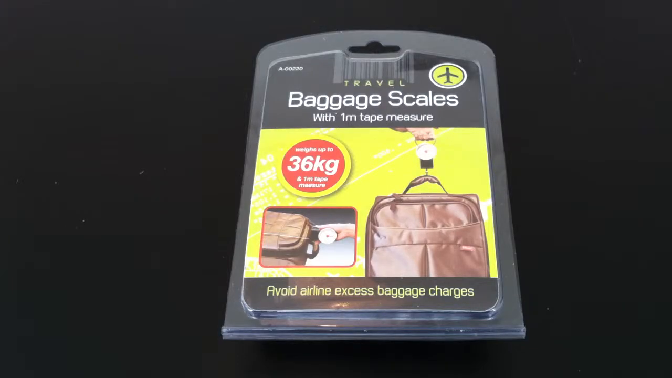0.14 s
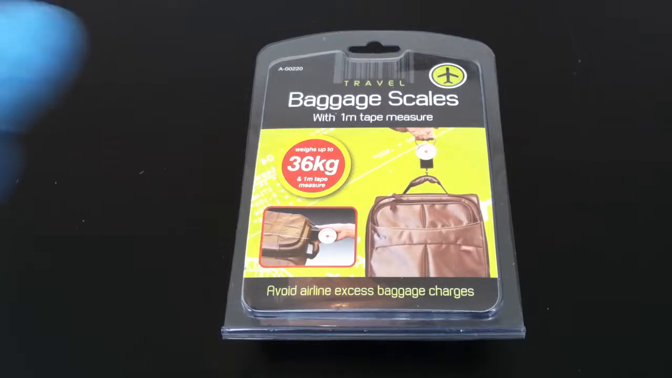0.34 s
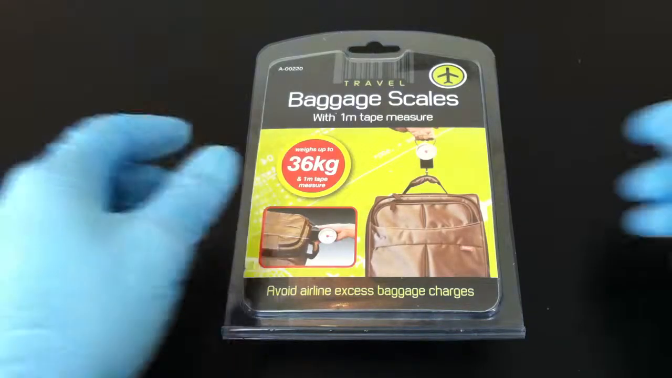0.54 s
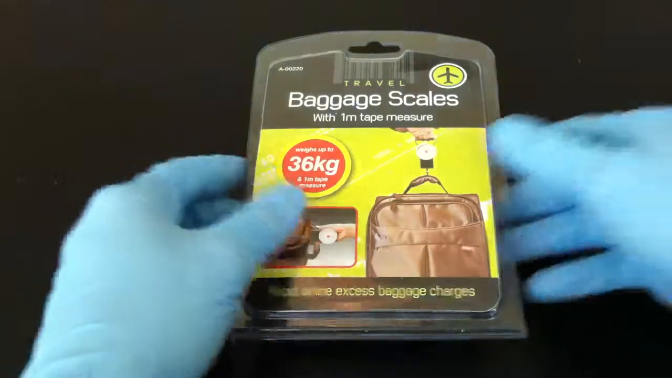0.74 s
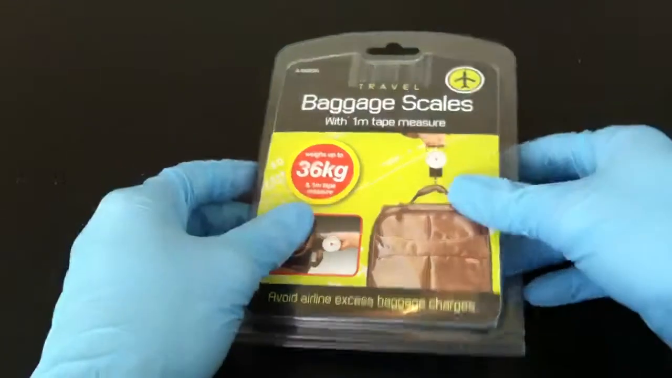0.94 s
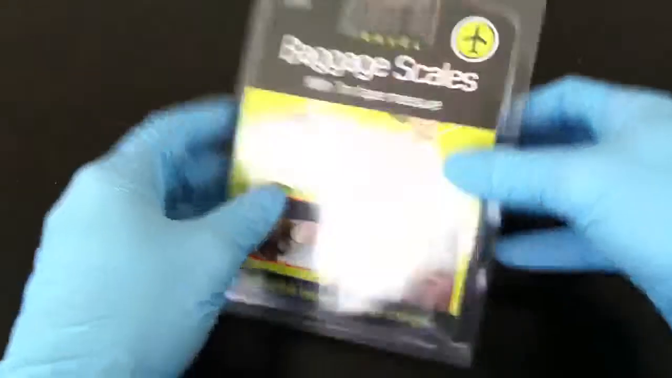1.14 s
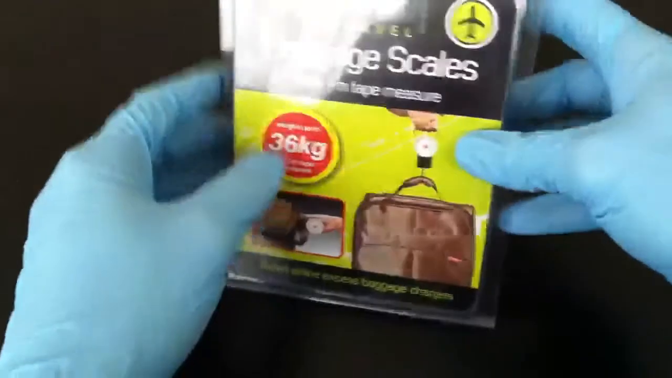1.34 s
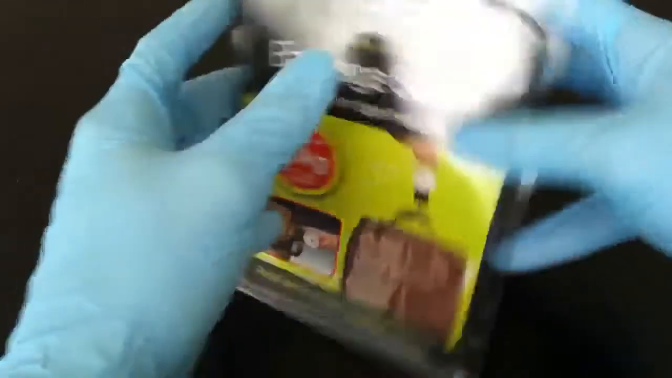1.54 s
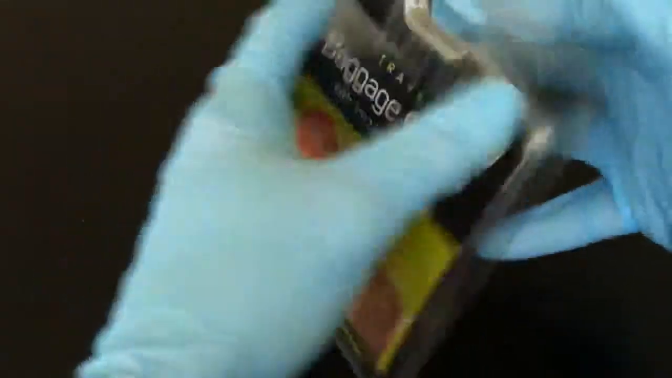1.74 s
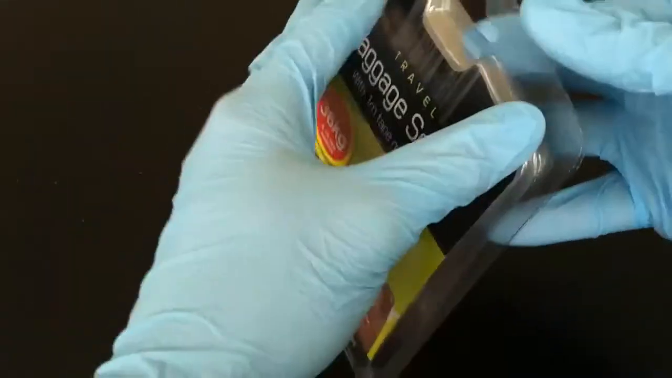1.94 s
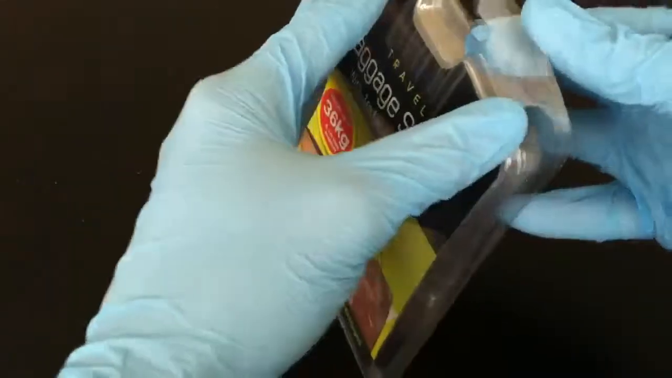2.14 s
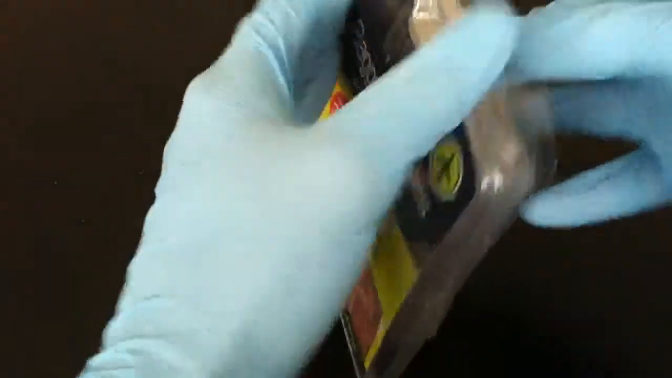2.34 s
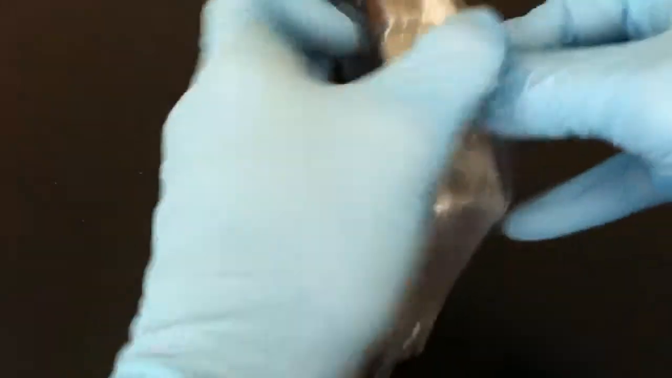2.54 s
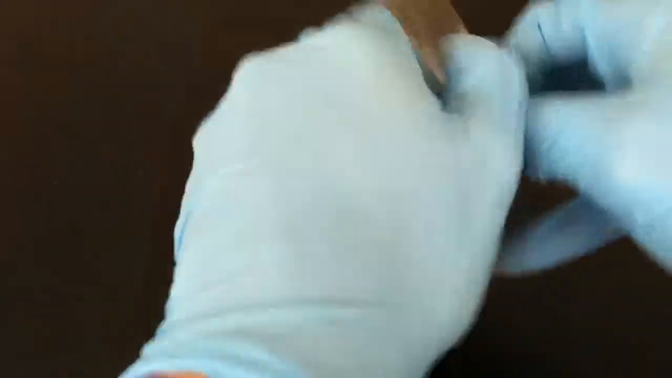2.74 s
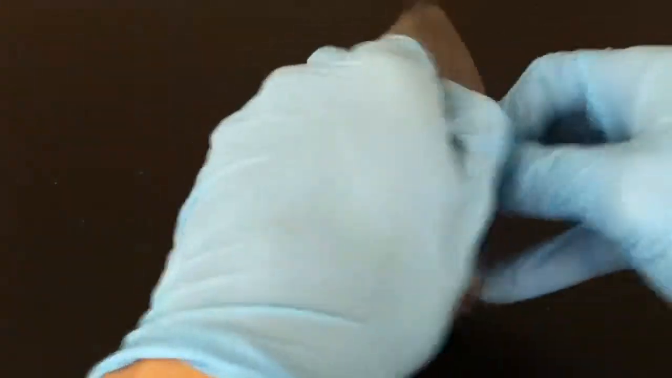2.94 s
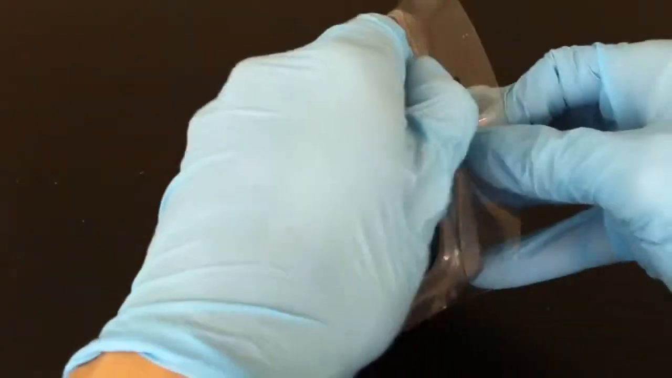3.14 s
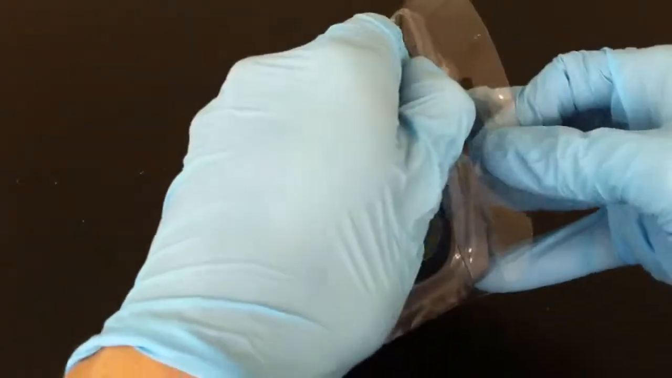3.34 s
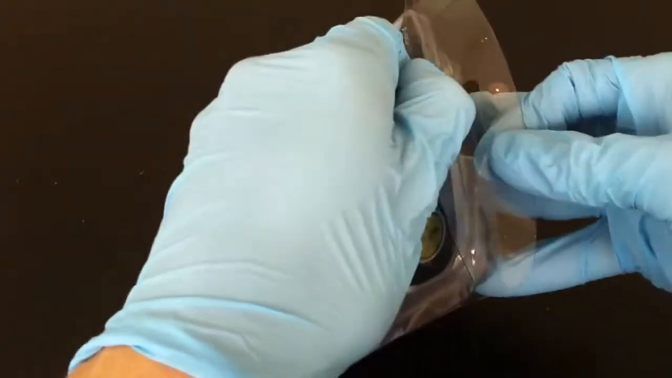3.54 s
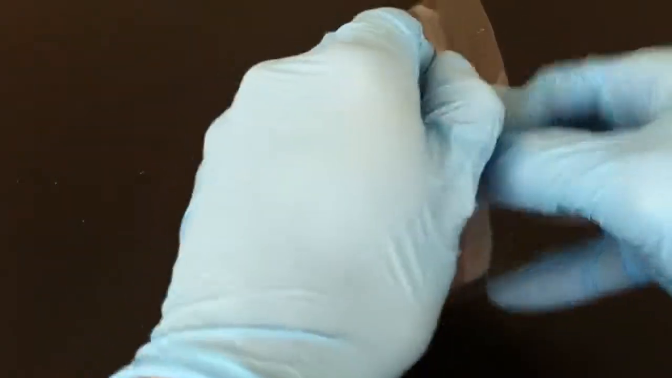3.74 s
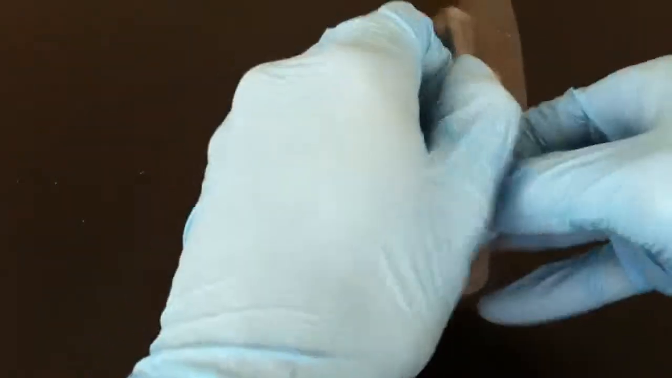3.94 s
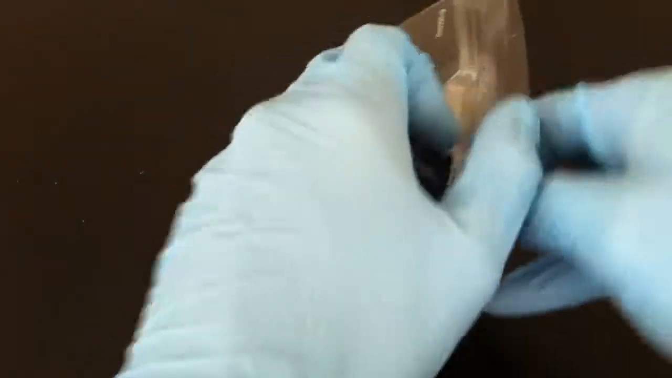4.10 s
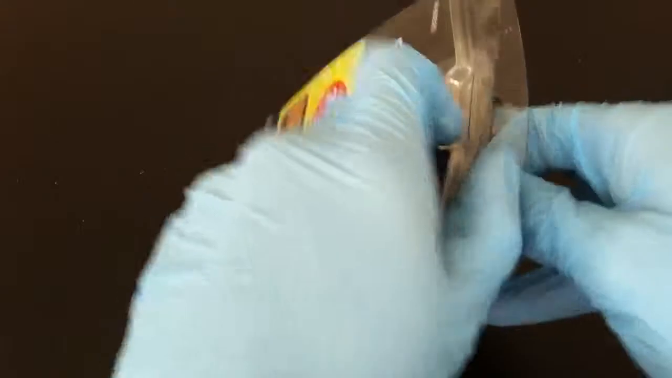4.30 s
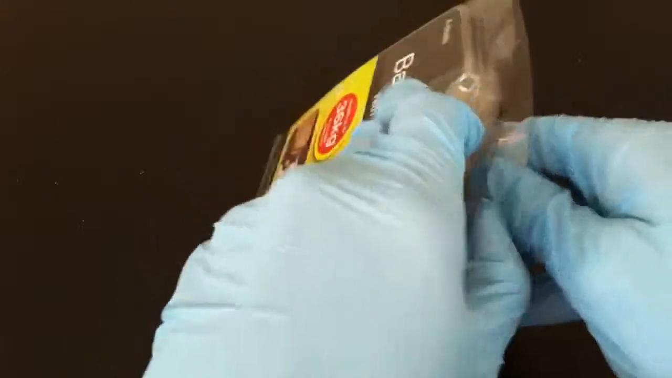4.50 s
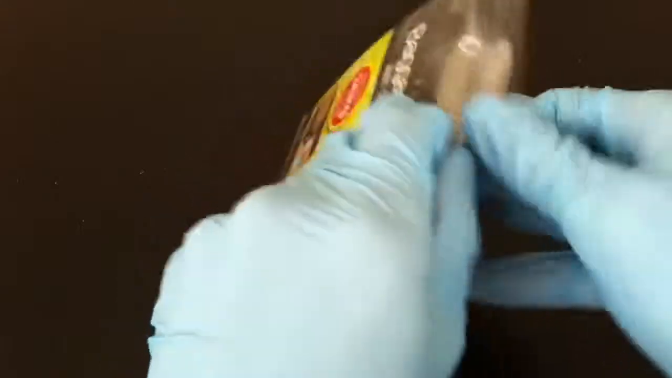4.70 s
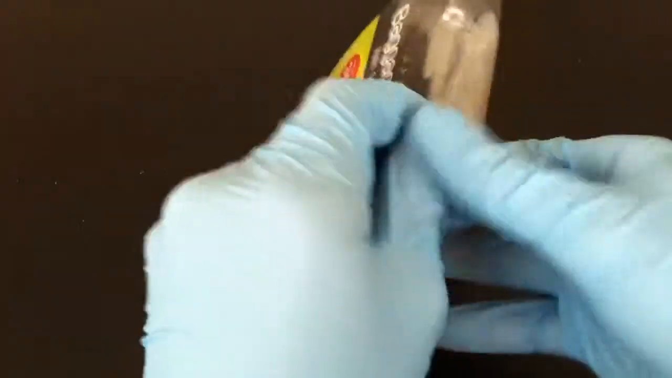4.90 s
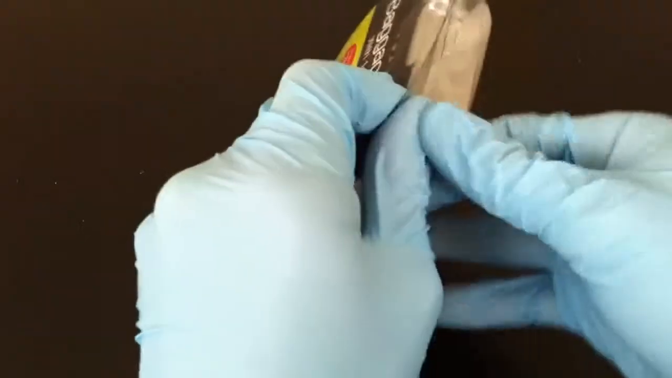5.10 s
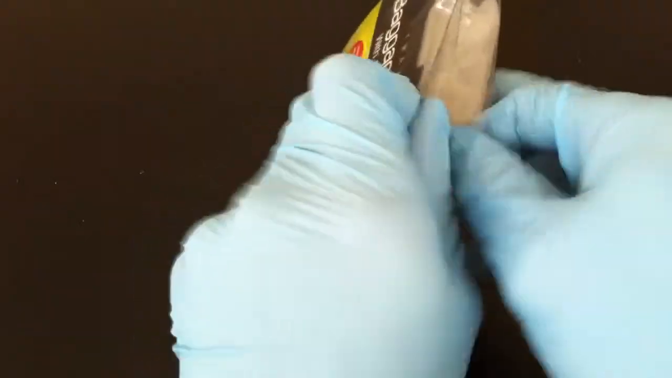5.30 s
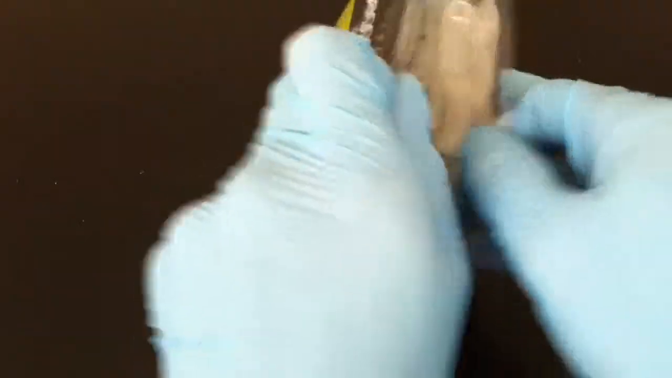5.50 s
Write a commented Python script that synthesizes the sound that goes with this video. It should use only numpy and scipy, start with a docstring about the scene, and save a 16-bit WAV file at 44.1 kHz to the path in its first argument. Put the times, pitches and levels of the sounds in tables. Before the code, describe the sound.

After a nearly silent start with faint room air, fingers bump and scuff a hollow plastic shell. Glove rubbing swells with short creaks and dry clicks, then the seam gives way: a weak pop, two hard cracks, quieter handling, and a final crack after a rapid zip of slips. Close microphone, small bare reverberant room.

```python
"""Gloved hands pick up a stiff plastic blister pack and pry it open, close to the microphone in a quiet, bare room.
Under steady room air (shaped noise), gloves rub the sheet (dense micro-slips) and creases tick (short cracks).
Then fingers bump the hollow shell and scuff (low modes struck by noise), and gloves judder (stick-slip at the rim).
The seam pops four times, softly at first (crack, sheet modes and air puff), the last after a short ratcheting slip.
The room answers the handling and the pops with a diffuse tail."""
import sys
import numpy as np
from scipy import signal
from scipy.fft import rfft, irfft
from scipy.io import wavfile

SR = 44100
rng = np.random.default_rng(int(sys.argv[2]) if len(sys.argv) > 2 else 0)


def output_pcm(signal):
    """Save a mono or channel-first signal as 16-bit PCM at the path in sys.argv[1].

    Samples are clipped to [-1, 1] before scaling.
    """
    pcm = np.clip(np.atleast_2d(signal).T, -1, 1) * 32767
    wavfile.write(sys.argv[1], SR, np.round(pcm).astype(np.int16))


N = 249606
T = np.arange(N) / SR  # time in the scene [s]
BLOW = T[:SR // 4]  # time since one blow [s]


def undb(db):
    """Level law: amplitude gain is ten to the level in decibels over twenty."""
    return 10 ** (np.asarray(db) / 20)


def unit(x):
    """Power normalization: the signal is scaled to rms 1."""
    return x / np.sqrt(np.mean(x ** 2))


def burst(x, db, span=1 / 200):
    """Energy normalization: the level is the rms of all the energy packed into span seconds."""
    return x * undb(db) / np.sqrt(np.sum(x ** 2) / (span * SR))


def add(track, s, x):
    """Superposition: x is mixed into the track from time s."""
    i = int(np.clip(s * SR, 0, N - 1))
    track[i:i + len(x)] += x[:N - i]


def colour(x, points):
    """Spectral shaping: gain in decibels is interpolated over log frequency."""
    hz, db = np.transpose(points)
    f = np.maximum(np.arange(len(x) // 2 + 1) * SR / len(x), 1)
    gain = undb(np.interp(np.log(f), np.log(hz), db))
    return irfft(rfft(x) * gain, len(x))


def filtered(x, order, hz, kind):
    """Butterworth filtering: a flat passband with smooth slopes."""
    return signal.sosfilt(signal.butter(order, hz, kind, fs=SR, output="sos"), x)


def resonate(x, hz, q):
    """Simple resonance: a two-pole band-pass, whose Q is held to at least 1."""
    b, a = signal.iirpeak(min(hz, SR / 3), max(q, 1), fs=SR)
    return signal.lfilter(b, a, x)


def decaying(t, t60):
    """Exponential decay: amplitude falls by 60 dB in t60 seconds."""
    return np.exp(-np.log(1000) * t / t60)


def ring(modes, weights=1):
    """Modal superposition: a blow excites damped sines, neighbours in opposite phase."""
    hz, db, t60 = np.transpose(modes)
    gain = undb(db) * weights * (-1) ** np.arange(len(hz))
    swings = np.sin(2 * np.pi * np.outer(hz, BLOW))
    return gain @ (swings * decaying(BLOW, t60[:, None]))


def convolve(x, response):
    """Linear response: each sample of x launches the response; the length of x is kept."""
    return signal.fftconvolve(x, response)[:len(x)]


# spectrum of the room's steady air: (frequency [Hz], relative level [dB])
AIR_SPECTRUM = [(30, 7.5), (70, -4), (110, -4.5), (160, -0.5), (250, 1.5), (400, -5.5), (630, -9.5),
                (1100, -12), (2200, -16), (5000, -20), (9000, -21), (15500, -24)]


def room_air(level_db=-63.5):
    """Stationary background noise: a random signal with a fixed spectrum."""
    return undb(level_db) * unit(colour(rng.standard_normal(N), AIR_SPECTRUM))


STROKE_CREST = 0.51  # share of a stroke's length at which speed peaks
STROKE_SHARPNESS = 1.2  # a higher exponent narrows the swell


def stroke(start, length):
    """Accelerated sliding: speed, 0-1, swells to a crest and returns to rest."""
    angle = np.interp(T, start + length * np.array([0, STROKE_CREST, 1]), [0, 1, 0])
    return np.sin(np.pi / 2 * angle) ** STROKE_SHARPNESS * (angle > 0)


# gloves creep on the held pack: (start [s], end [s], body level [dB], hiss level [dB])
GRIP_HOLDS = [(0.384, .9, -80, -70), (0.971, 3.0, -68.5, -69.5), (3.678, 4.52, -64.5, -65.5),
              (4.718, 5.42, -69, -64.5)]
GRIP_FADE_S, GRIP_WAVER_DB, GRIP_WAVER_HZ = 0.033, 2.5, 9
# a glove slides over the sheet: (start [s], length [s], body level [dB], hiss level [dB])
GLOVE_STROKES = [(0.833, 0.028, -57.5, -59), (1.226, 0.17, -58, -56.5), (1.297, 0.036, -43.5, -52),
                 (1.612, 0.089, -50.5, -48), (1.668, 0.28, -50, -53.5), (1.79, 0.089, -45.5, -47),
                 (2.472, .17, -58, -61.5), (2.653, 0.13, -46, -51.5), (2.734, .24, -44.5, -46),
                 (4.571, 0.039, -65.5, -54.5), (4.727, 0.069, -57.5, -56), (4.9, 0.061, -57.5, -61),
                 (5.022, 0.033, -69.5, -64.5), (5.249, 0.051, -54, -54.5), (5.617, 0.038, -52, -75)]
# each fingertip scuffs as it lands: levels relative to its bump, lead before it and length
SCUFF_BODY_DB, SCUFF_HISS_DB, SCUFF_LEAD_S, SCUFF_S = -9, -15.5, 0.012, 0.046


def sliding():
    """Incoherent addition: grip, strokes and scuffs sum in power, giving body and hiss gains."""
    knots = np.arange(0, T[-1] + 1, 1 / GRIP_WAVER_HZ)
    waver = undb(GRIP_WAVER_DB * np.interp(T, knots, rng.standard_normal(len(knots))))
    moves = []
    for start, end, body, hiss in GRIP_HOLDS:
        hold = np.clip(np.minimum(T - start, end - T) / GRIP_FADE_S, 0, 1)
        moves.append((waver * hold, body, hiss))
    for s, length, body, hiss in GLOVE_STROKES:
        moves.append((stroke(s, length), body, hiss))
    for s, db, _ in FINGER_BUMPS:
        scuff = stroke(s - SCUFF_LEAD_S, SCUFF_S)
        moves.append((scuff, db + SCUFF_BODY_DB, db + SCUFF_HISS_DB))
    return np.sqrt(sum(np.outer(undb([body, hiss]), speed) ** 2 for speed, body, hiss in moves))


# friction sounding through the sheet: (frequency [Hz], relative level [dB])
BODY_SPECTRUM = [(90, -29.5), (170, -13.5), (300, -1), (480, -1), (650, -5), (850, 0.5), (1100, -3.5),
                 (1600, -5.5), (2300, -7), (3200, -13.5), (5000, -19.5), (16000, -43)]
# friction hissing at the contact: (frequency [Hz], relative level [dB])
HISS_SPECTRUM = [(800, -20.5), (2500, -6), (3800, -2), (4800, -2.5), (6000, -4), (8500, -4.5), (10500, -13),
                 (13000, -15), (16000, -19)]


def rubbing(grain_rate=1800, grain_db=3.0, smooth=1.0, patchy_db=2.0):
    """Dry friction: dense micro-slips (per second) in uneven patches sound the sheet and hiss."""
    slow = colour(rng.standard_normal(N), [(10, 0), (90, 0), (300, -40), (1000, -90)])
    patches = undb(patchy_db * unit(slow))
    out = 0
    for gain, spectrum in zip(sliding(), (BODY_SPECTRUM, HISS_SPECTRUM)):
        sizes = undb(grain_db * np.minimum(rng.exponential(size=N), 5))
        slips = (rng.random(N) < grain_rate / SR) * sizes * rng.choice([-1, 1], N)
        friction = unit(slips) + smooth * rng.standard_normal(N)
        out = out + unit(colour(friction, spectrum) * patches) * gain
    return out


def many_modes(x, share, t60):
    """High modal density: countless weak modes ring on as decaying noise and ripple the spectrum."""
    after = rng.standard_normal(len(BLOW)) * decaying(BLOW, t60)
    after /= np.sqrt(np.sum(after ** 2))
    return (x + share * convolve(x, after)) / np.hypot(1, share)


# reverberation of the bare room: (frequency [Hz], relative level [dB], t60 [s])
ROOM_BANDS = [(100, -12.5, 0.51), (300, -3.5, .7), (584, -3.5, 0.51), (1220, -6, 0.75), (2430, -7.5, 0.76),
              (4830, -8.5, 0.64), (9000, -12.5, 0.4), (16000, -19.5, .32)]
ROOM_GAP_S, ROOM_EARLY = 0.011, 0.53  # time at which the weak early part ends, and its share of full gain


def room(x):
    """Diffuse reverberation: weak early sound builds to a noise tail whose high treble dies first."""
    t = T[:SR]
    hz, db, t60 = np.transpose(ROOM_BANDS)
    log_f = np.log(np.maximum(np.arange(SR // 2 + 1), 1))
    noise = rfft(rng.standard_normal(SR))
    onset = np.interp(t, ROOM_GAP_S * np.array([0, 1 / 3, 1, 2.2]), [0, ROOM_EARLY, ROOM_EARLY, 1])
    response = 0
    for share, band_db, band_t60 in zip(np.eye(len(hz)), db, t60):
        fade = onset * decaying(t, band_t60)
        # each band overlaps its neighbours as a triangle over log frequency
        band = irfft(noise * np.interp(log_f, np.log(hz), share), SR)
        response = response + undb(band_db) * band * fade / np.sqrt(np.sum(fade ** 2))
    return convolve(x, response)


STRAY_PER_S, STRAY_CRACK_DB, STRAY_SHEET_DB, STRAY_SCATTER_DB = 4, -68, -63.5, 1


def stray_ticks():
    """Random point process: faint ticks fall anywhere in a hold, as (s, crack dB, sheet dB)."""
    rows = []
    for start, end, _, _ in GRIP_HOLDS:
        count = round(STRAY_PER_S * (end - start))
        for when, hard, deep in rng.uniform(-1, 1, (count, 3)):
            s = start + (end - start) * (when + 1) / 2
            crack_db = STRAY_CRACK_DB + STRAY_SCATTER_DB * hard
            rows.append((s, crack_db, STRAY_SHEET_DB + STRAY_SCATTER_DB * deep))
    return rows


def crack(db, hz, decay, q=2.0, kick=1.3, splash_db=-20):
    """Impulsive release: a kick and a spray of after-slips ring the plastic edge and splash treble."""
    push = burst(rng.standard_normal(len(BLOW)) * np.exp(-BLOW / decay), 0)
    push[0] = kick * np.sqrt(np.sum(push ** 2))
    edge = filtered(resonate(push, hz, q), 3, [hz / 3, min(hz * 1.77, SR / 2.5)], "band")
    splash = filtered(push, 2, [hz / 3, 13500], "band")
    return burst(edge + undb(splash_db) * splash, db)


# bending modes of the stiff sheet: (frequency [Hz], relative level [dB], t60 [s])
SHEET_MODES = [(463, -4.5, 0.04), (691, 2.5, 0.019), (816, -7, 0.038), (949, 1.5, 0.034),
               (1230, 0.5, 0.015), (1382, 0.5, 0.039), (1742, 8.5, 0.011), (2034, 2.5, 0.025),
               (2396, 3.5, 0.014), (2870, -6.5, 0.025), (2950, -10, .011)]


def flex(db, hz, octaves=1.1, scatter_db=1.5):
    """Selective modal excitation: the size of the springing patch favours sheet modes near hz."""
    distance = np.log2(np.transpose(SHEET_MODES)[0] / hz) / octaves
    scatter = undb(scatter_db * rng.standard_normal(len(SHEET_MODES)))
    return burst(ring(SHEET_MODES, scatter / (1 + distance ** 2)), db)


# creases and nail ticks: (time [s], crack level [dB], sheet level [dB])
CREASE_TICKS = [(.5438, -54, -63), (1.0005, -77, -52), (1.0162, -57.5, -65), (1.1940, -73, -50.5),
                (1.3058, -48.5, -46.5), (1.6087, -66, -53), (1.6760, -39.5, -46), (2.2256, -44.5, -72),
                (2.2293, -68, -41.5), (2.5212, -50, -53), (2.7925, -78, -40), (3.2892, -68, -39.5),
                (3.6951, -59.5, -71.5), (3.8355, -60, -55), (3.8862, -67, -50.5), (4.2230, -61, -53),
                (4.5930, -56.5, -52.5), (4.7337, -57.5, -52.5), (5.1270, -88, -51.5), (5.2646, -43, -58),
                (5.3196, -47.5, -55.5), (5.347, -47.5, -73), (5.631, -66, -55)]
# a harder tick is brighter: pitch at a reference level, and the rise that lifts it by an octave
TICK_HZ, TICK_REFERENCE_DB, TICK_OCTAVE_DB = 5300, -56.5, 32


def ticks():
    """Snap-through buckling: small creases flip with a click and a little knock of the sheet."""
    out = np.zeros(N)
    for s, crack_db, sheet_db in CREASE_TICKS + stray_ticks():
        crack_hz = TICK_HZ * 2 ** ((crack_db - TICK_REFERENCE_DB) / TICK_OCTAVE_DB)
        add(out, s, crack(crack_db, crack_hz, decay=0.0013, q=1.2, kick=0.53, splash_db=-8.5))
        add(out, s, flex(sheet_db, 640, octaves=1.0))
    return out


# low modes of the hollow shell: (frequency [Hz], relative level [dB], t60 [s])
SHELL_MODES = [(176, -4, 0.098), (245, -3.5, 0.055), (333.6, -0.5, 0.24), (450, -5, 0.032),
               (604, -8, 0.051), (744, -4, 0.043)]
# fingers pressing the shell: (time [s], level [dB], contact time [s])
FINGER_BUMPS = [(.860, -48.5, .04), (1, -49.5, 0.03), (1.197, -52.5, 0.017), (1.306, -45.5, 0.031),
                (1.557, -48, 0.051), (1.605, -57.5, 0.024), (1.661, -52.5, 0.067), (1.844, -52.5, 0.056),
                (2.228, -46.5, 0.0052), (2.789, -49, .017), (2.921, -39.5, .018), (3.718, -59.5, 0.013),
                (4.478, -54, 0.022), (4.733, -52, 0.037), (4.836, -56, 0.014), (4.934, -54.5, 0.017),
                (5.058, -60, 0.042), (5.280, -54, 0.028)]


def bumps(scatter_db=3.5):
    """Soft impact: a fingertip lands and drags; each spot of the shell favours other modes."""
    out = np.zeros(N)
    for s, db, contact in FINGER_BUMPS:
        push = rng.standard_normal(len(BLOW)) * np.exp(-(BLOW / contact) ** 4)
        push[0] = 0.7 * np.sqrt(np.sum(push ** 2))
        shell = ring(SHELL_MODES, undb(scatter_db * rng.standard_normal(len(SHELL_MODES))))
        add(out, s, burst(convolve(push, shell), db, span=0.028))
    return out


# modes of the pinched rim: (frequency [Hz], relative level [dB], t60 [s])
RIM_MODES = [(771, -6, 0.025), (845, -5.5, 0.027), (1280, -12.5, 0.018), (1960, -16, 0.005),
             (3030, -4.5, .003)]
# the glove sticks and slips: (start [s], length [s], level before the mix [dB], slip rate [1/s])
GLOVE_JUDDERS = [(1.524, 0.058, -53.5, 87), (1.81, 0.067, -42.5, 100), (2.781, 0.19, -51, 70)]


def judders(jitter=0.18, slip_decay=0.0021):
    """Stick-slip: the glove catches and lets go in a quick uneven train, so that the rim creaks."""
    out, rim = np.zeros(N), ring(RIM_MODES)
    for s, length, db, rate in GLOVE_JUDDERS:
        wander = jitter * np.sin(2 * np.pi * (BLOW / length + rng.random()))
        since_slip = (BLOW * rate + wander) % 1 / rate
        swell = np.sin(np.pi * np.minimum(BLOW / length, 1))
        push = rng.standard_normal(len(BLOW)) * np.exp(-since_slip / slip_decay) * swell
        add(out, s, burst(convolve(push, rim), db, span=length))
    return out


def hump(db, hz, q, dull_hz):
    """Modal overlap: many blurred modes act as a pulse with one broad resonance."""
    pulse = resonate(signal.unit_impulse(len(BLOW)), hz, q)
    return burst(filtered(pulse, 2, min(dull_hz, SR / 2.5), "low"), db)


def spread(parts):
    """Power summation: sound sent all ways adds without notches, as a pulse centred at 3 ms."""
    power = sum(np.abs(rfft(part)) ** 2 for part in parts)
    return np.roll(irfft(np.sqrt(power)), int(0.003 * SR))[:SR // 20]


# seam pops: (time [s], crack level [dB], crack frequency [Hz], crack Q [1], crack decay [s],
# splash level re crack edge [dB], sheet level [dB], favoured sheet frequency [Hz], thump level [dB],
# thump frequency [Hz], lag of sheet and thump [s], room level [dB])
SEAM_POPS = [(2.4336, -48, 4650, 1.1, 0.0029, -9, -30.5, 1060, -40.5, 538, 0.00018, -1),
             (3.0378, -16.5, 6900, 3.4, .0028, -12, -19, 1274, -32, 397.4, 0.00072, -2),
             (3.9068, -22, 5030, 1.15, 0.0033, -26, -19.5, 1690, -35.5, 342, 0.00043, -0.5),
             (5.4286, -19.5, 4750, 3.1, 0.0014, -21, -28.5, 935, -27, 289, 0.0015, -2.5)]


def snaps(thump_decay=0.004, thump_room_db=-3, sheet_room_db=-3, modes_room_db=-3):
    """Sudden energy release: crack, then sheet flex and air puff; returns near sound and room share."""
    near, far = np.zeros(N), np.zeros(N)
    for (s, crack_db, crack_hz, q, decay, splash_db, sheet_db, sheet_hz,
         thump_db, thump_hz, lag, room_db) in SEAM_POPS:
        swing = np.sin(2 * np.pi * thump_hz * BLOW)
        puff = burst(swing * BLOW * np.exp(-2 * BLOW / thump_decay), thump_db)
        sheet = flex(sheet_db, sheet_hz, octaves=1.12)
        add(near, s, crack(crack_db, crack_hz, decay, q=q, kick=0.83, splash_db=splash_db))
        add(near, s + lag, sheet + puff)
        # the room also hears the rest of the pack, whose many modes blur into broad humps
        edges = hump(crack_db, crack_hz, q=0.32 * q, dull_hz=1.65 * crack_hz)
        panels = hump(sheet_db + sheet_room_db, 0.63 * sheet_hz, q=1.5, dull_hz=5.1 * sheet_hz)
        parts = [edges, panels, undb(modes_room_db) * sheet, undb(thump_room_db) * puff]
        add(far, s, undb(room_db) * spread(parts))
    return near, far


# seam slips before the last pop: (first level [dB], last level [dB], frequency [Hz], decay [s])
SEAM_RATCHET = (-41, -25.5, 4650, .0009)
RATCHET_START_S, RATCHET_PER_S = 5.4091, 352


def ratchet():
    """Incremental fracture: the seam slips in quick, nearly even steps that grow louder."""
    first_db, last_db, hz, decay = SEAM_RATCHET
    out = np.zeros(N)
    for k, db in enumerate(np.linspace(first_db, last_db, 7)):
        late = 0.06 * rng.standard_normal()  # in steps
        s = RATCHET_START_S + (k + late) / RATCHET_PER_S
        add(out, s, crack(db, hz, decay, q=4.5, kick=1.2, splash_db=-30))
    return out


def scene():
    """Direct and reverberant fields: handling and snaps, the room's answer and its steady air."""
    air = room_air()
    rub = many_modes(rubbing(), share=0.42, t60=0.014)
    clicks, knocks, creaks = ticks(), bumps(), judders()
    pops, pops_far = snaps()
    seam = ratchet()
    pops_far = many_modes(pops_far + seam, share=0.25, t60=0.05)
    to_room = undb(2.0) * rub + undb(-6.0) * knocks + undb(-4.5) * creaks
    to_room = to_room + undb(-0.5) * clicks + undb(0.72) * pops_far
    direct = undb(-0.6) * rub + knocks + undb(-0.5) * creaks + clicks + seam + pops
    return (direct + room(to_room) + air)[None]


def record(dry, low_cut_hz=165, top_hz=16000):
    """Band limitation: the small microphone thins out the bass, and the recorder cuts the top."""
    thin = filtered(dry, 2, low_cut_hz, "high")
    return signal.sosfilt(signal.ellip(10, 0.2, 80, top_hz, fs=SR, output="sos"), thin)


dry = scene()
out = record(dry)
output_pcm(out)
```